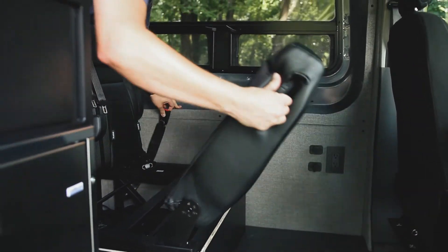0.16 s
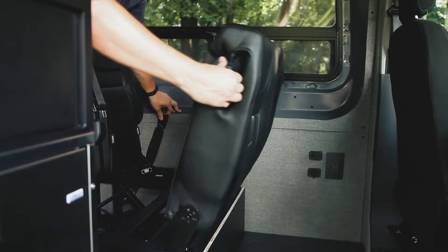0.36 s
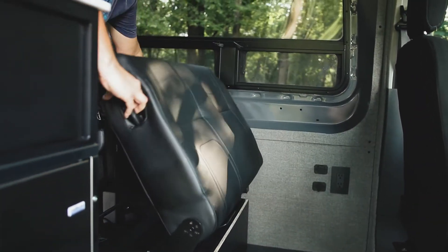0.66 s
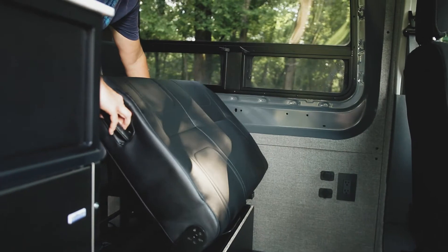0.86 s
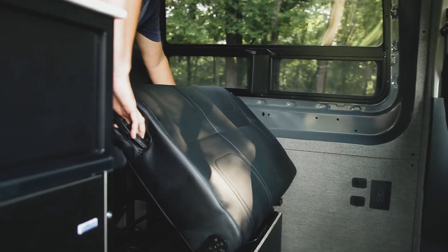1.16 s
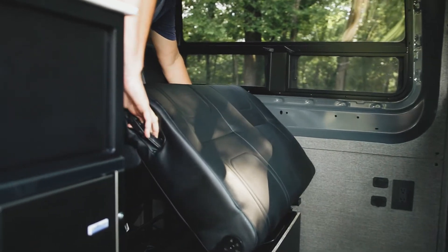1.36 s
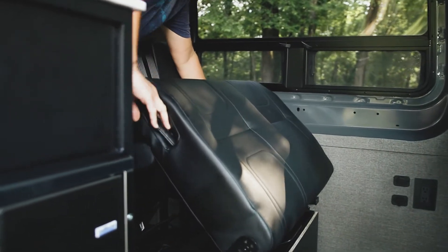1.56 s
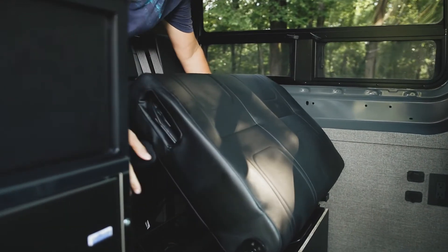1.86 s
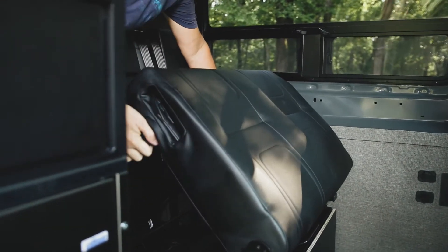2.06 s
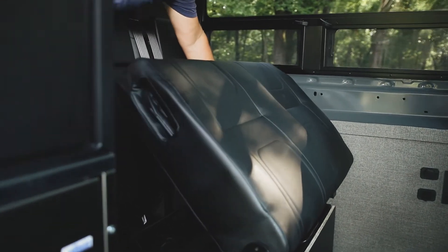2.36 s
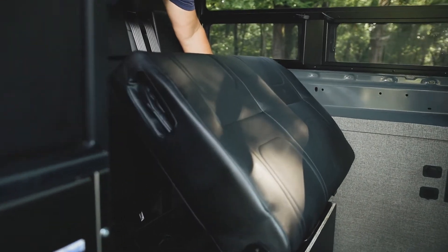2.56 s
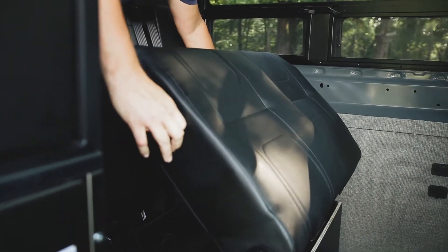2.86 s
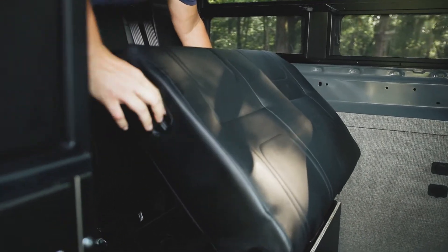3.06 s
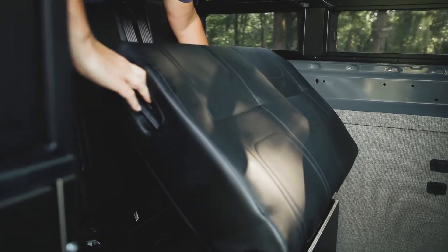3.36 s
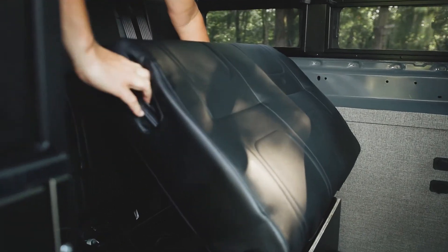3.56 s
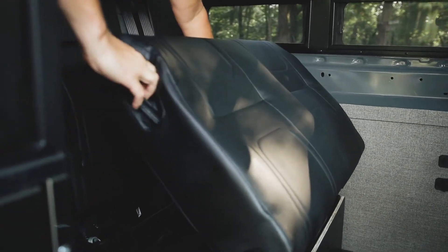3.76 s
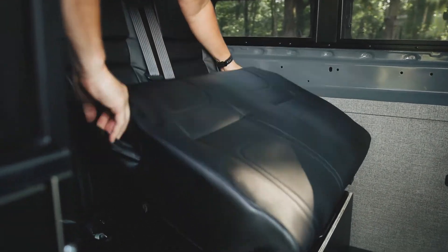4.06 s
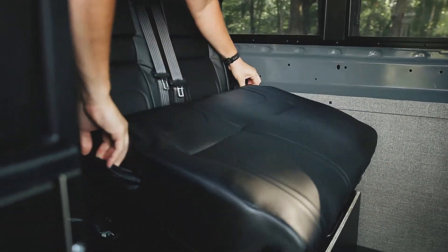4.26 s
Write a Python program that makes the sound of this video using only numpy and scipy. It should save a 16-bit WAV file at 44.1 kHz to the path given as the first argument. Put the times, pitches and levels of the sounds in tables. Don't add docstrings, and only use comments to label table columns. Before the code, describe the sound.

A padded bench seat is folded by hand: a brief rough hinge judder with bright vinyl friction, then light ticks and muffled cushion knocks. Midway comes a very sharp double latch click, by far the loudest event, with a short plate ring. Creasing and dull bumps lead to a low closing thud. Small dead interior, close miking, low rumbling sway and soft hiss.

```python
import sys
import numpy as np
from scipy import signal
from scipy.fft import rfft, irfft
from scipy.io import wavfile
from scipy.ndimage import uniform_filter1d

SR = 44100
rng = np.random.default_rng(int(sys.argv[2]) if len(sys.argv) > 2 else 0)


def generate_wav(sig):
    pcm = np.round(np.clip(np.atleast_2d(sig).T, -1, 1) * 32767).astype(np.int16)
    wavfile.write(sys.argv[1], SR, pcm)


def gain_from_db(level_db):
    decades = np.asarray(level_db, float) / 20
    return 10 ** decades


N = 194657


def evened(x):
    return x / np.sqrt(np.mean(x ** 2) + 1e-20)


def coloured(x, points):
    f, db = np.transpose(points)
    hz = np.fft.rfftfreq(len(x), 1 / SR)
    gain_db = np.interp(np.log(hz + 1), np.log(f + 1), db, -90, -90)
    return evened(irfft(rfft(x) * gain_from_db(gain_db), len(x)))


def band(x, lo_hz, hi_hz, order=2):
    sos = signal.butter(order, [lo_hz, min(hi_hz, 20000)], "bandpass", fs=SR, output="sos")
    return signal.sosfilt(sos, x)


def resonate(x, hz, width_hz):
    radius = np.exp(-np.pi * width_hz / SR)
    pole = radius * np.exp(2j * np.pi * hz / SR)
    return 2 * signal.lfilter([1 - radius], [1, -pole], x).real


def layers(x, edges_hz):
    hz = np.fft.rfftfreq(len(x), 1 / SR)
    octaves = np.log2((hz + 1) / np.reshape(edges_hz, (-1, 1)))
    above = .5 + .5 * np.tanh(5 * octaves)
    shares = -np.diff(above, axis=0)
    return (evened(irfft(rfft(x) * share, len(x))) for share in shares)


def columns(rows):
    s, *rest = np.transpose(rows)
    t = np.arange(s[0], s[-1], 1 / SR)
    return [np.interp(t, s, c) for c in rest]


def swells(s, db, rise_s, settle_s):
    s, db, rise_s, settle_s = (np.reshape(c, (-1, 1)) for c in (s, db, rise_s, settle_s))
    coarse = np.arange(0, N, 16)
    late = coarse / SR - s
    span = np.where(late < 0, -rise_s, settle_s)
    power = gain_from_db(db - 30 * abs(late / span)) ** 2
    return np.interp(np.arange(N), coarse, np.sqrt(power.sum(0)))


def crackle(count, per_s, spread_db):
    size = gain_from_db(spread_db * np.minimum(rng.exponential(1, count), 5))
    return evened(size * rng.standard_normal(count) * (rng.random(count) < per_s / SR))


def add(mix, s, sound):
    part = mix[round(s * SR):][:len(sound)]
    part += sound[:len(part)]


def play(mix, rows, sound):
    for s, *rest in rows:
        add(mix, s, sound(*rest))


# (frequency [Hz], density [dB per Hz])
CUSHION = [(35, -26), (60, -20), (87, 8), (157, 1.5), (295, 0.5), (389, -5.5), (459, -1.5), (981, -7),
           (1270, -1.5), (5000, -25.5), (6500, -18), (11000, -120)]
LAYERS_HZ = (85, 300, 1000, 3500)
# (time [s], level [dB], rise by 30 dB [s], settling by 30 dB [s])
RUBS = [(0.01, -54.5, 0.087, 1), (.21, -52, 0.29, 0.036), (.7, -53.5, 0.017, 1),
        (0.999, -49.5, 0.22, 0.065), (1.222, -54, 0.1, 0.021), (1.4, -55, 0.22, 0.055),
        (1.691, -53, 0.028, 0.35), (1.96, -49.5, 0.59, 0.27), (2.2, -62, 0.072, 0.39),
        (2.556, -55, 0.11, 0.066), (2.82, -62.5, 0.5, 0.026), (3.14, -59, 0.95, 0.35),
        (3.59, -53.5, 0.29, 0.081), (3.68, -59, .1, 0.11), (3.856, -54, 0.23, 0.037),
        (4.091, -54, 0.65, 0.075)]
# (time [s], level [dB], settling by 30 dB [s], foam weight [dB], skin rasp [dB])
GRIPS = [(.58, -43, .2, 4, -10), (.66, -58, .35, 10, -10), (1.228, -43.5, .14, -6, -16),
         (1.354, -53, .1, 1, -12), (1.414, -43, .11, -5, -12), (2.02, -26, .02, -5, 0),
         (2.033, -40, .14, 2, -2), (2.058, -43, .12, 2, 0), (2.076, -39, .07, 0, 0),
         (2.094, -18, .03, -14, -12), (2.11, -38, .09, 4, -5), (2.838, -49, .083, -6, -13),
         (3.274, -52, .05, -8, -10), (3.35, -49, .12, 0, -10), (3.616, -40, .12, -6, -14),
         (3.49, -54, .12, 2, -14), (3.865, -50, .12, 4, -20), (4.112, -41, .07, 3, -8),
         (4.15, -48, .3, -2, -3), (4.2, -47, .4, 2, -4), (4.28, -39, .1, 4, -9), (4.297, -41, .12, 7, -9),
         (4.326, -41, .075, 5, -10)]


def rub():
    clumps = gain_from_db(1.06 * evened(band(rng.standard_normal(N), 23.2, 47)))
    grains = rng.standard_normal(N) + 0.23 * crackle(N, 400, 4.0)
    foam, cover, rasp = layers(coloured(clumps * grains, CUSHION), LAYERS_HZ)
    s, db, settle_s, foam_db, rasp_db = np.transpose(GRIPS)
    rise_s = 0.014
    grips = swells(s, db, rise_s, settle_s)
    rubs = swells(*np.transpose(RUBS))
    weight = swells(s, db + foam_db, rise_s, 1.1 * settle_s) + gain_from_db(-2) * rubs
    skin = swells(s, db + rasp_db, rise_s, settle_s) + gain_from_db(-6) * rubs
    return gain_from_db(-5.0) * ((grips + rubs) * cover + skin * rasp + weight * foam)


# (time [s], level [dB], settling by 30 dB [s], its sign is of no effect)
JOLTS = [(.13, -47, 2.5), (.22, -46, 2.5), (.47, -47, -0.8), (.8, -68, -1.5), (1.26, -47.5, 0.8),
         (1.47, -57, 6), (1.73, -58, 1), (2.1, -32.5, 0.32), (2.299, -50.5, 0.9), (2.5, -55, 1),
         (2.84, -53.5, 0.5), (3.13, -60, -5), (3.45, -53.5, 4), (3.63, -43, 0), (3.87, -45, 0.7),
         (4.2, -44.5, -8), (4.29, -38, -7), (4.39, -45, -2)]


def sway():
    s, db, settle_s = np.transpose(JOLTS)
    wobble = evened(band(rng.standard_normal(N), 18.3, 80.6, order=3))
    wobble /= np.sqrt(uniform_filter1d(wobble ** 2, 5000))
    drift = evened(band(rng.standard_normal(N), 3.1, 16.8))
    return swells(s, db - 6.0, 0.14, settle_s) * wobble + gain_from_db(-56.5) * drift


# (frequency [Hz], level [dB])
FRAME = [(110, 23), (215, 13), (300, 0.5), (380, 5), (480, -13), (600, -0.5), (790, -26), (1000, -68),
         (1300, 3), (1600, 9), (2250, -43)]


def knock(db, hz, t60, edge_db, contact_ms):
    t = np.arange(round(.2 * SR)) / SR - .0035
    chance = rng.standard_normal((3, len(t)))
    fall = gain_from_db(-60 * t / t60) * (t > 0)
    bounces = chance[0] * (abs(chance[1]) > 2.6) * fall
    blow = 1.16 * np.exp(-(t * SR) ** 2) + bounces + 0.13 * chance[1] * fall
    modes = np.zeros(len(t))
    for f, mode_db in FRAME:
        near = gain_from_db(mode_db - 16.0 * abs(np.log2(f / hz)))
        modes += near * resonate(blow, f, 0.9 / t60 + 0.14 * f) / np.sqrt(f)
    modes += gain_from_db(-20.0) * resonate(blow, hz, 5.4 / t60 + 0.0079 * hz) * np.sqrt(300 / hz)
    modes = band(modes, 0.35 * hz, 1000 / contact_ms, order=4)
    edge = band(chance[2] * fall, 1900, 6500)
    return gain_from_db(db) * (modes / abs(modes).max() + gain_from_db(edge_db) * edge / abs(edge).max())


# (time [s], peak level [dB], pitch of struck part [Hz], T60 [s])
HARD = [(0.134, -41.5, 173, 0.058), (0.599, -35, 253, 0.095), (0.978, -62, 447, 0.083),
        (1.229, -41, 435, 0.12), (1.329, -41.5, 270, 0.22), (1.413, -36.5, 476, 0.12),
        (2.105, -29, 715, 0.054), (2.23, -51, 172, 0.058), (2.538, -49, 370, 0.045),
        (3.215, -51, 245, 0.15), (3.614, -35.5, 345, 0.1), (4.105, -31.5, 277, 0.046),
        (4.119, -29, 344, 0.076)]
# (time [s], peak level [dB], pitch of struck part [Hz], T60 [s])
SOFT = [(0.213, -35, 222, 0.72), (3.345, -41, 298, 0.18), (3.66, -49, 295, 0.19), (1.178, -48, 307, 0.12),
        (1.249, -39, 160, 0.16), (1.698, -40.5, 830, 0.058), (2.829, -44, 380, 0.1),
        (3.268, -43.5, 298, 0.18), (3.629, -40, 294, 0.29), (3.795, -46, 174, 0.077),
        (3.862, -42, 284, 0.065), (3.884, -43, 248, 0.13), (3.918, -43, 174, 0.045),
        (4.128, -36, 171, 0.024), (4.271, -37, 181, 0.073), (4.28, -39, 234, 0.13), (4.323, -29, 302, 0.06)]


def hand_knocks(hits):
    play(hits, HARD, lambda *blow: knock(*blow, edge_db=-14.5, contact_ms=0.43))
    play(hits, SOFT, lambda *blow: knock(*blow, edge_db=-22, contact_ms=1.5))


# (time [s], effort level [dB], slip rate [Hz])
SWING = [(0.17, -65, 67.9), (0.22, -42.5, 71.13), (0.266, -33.5, 74.8), (0.34, -31, 85.4),
         (0.418, -26, 73.72), (0.464, -31, 65.76), (0.5, -31, 58.7), (0.542, -34.5, 58.7),
         (0.66, -65, 66.7)]
# (frequency [Hz], bandwidth [Hz], level [dB])
SEAT = [(240, 19, -6), (380, 16, 3.5), (600, 126, -7), (787, 29.4, -1.5), (950, 310, -14), (1444, 23, -2),
        (1640, 320, -12.5), (2470, 340, -8.5), (3110, 640, -13.5)]
# (time [s], level [dB], rise by 30 dB [s], settling by 30 dB [s])
PUMP = [
    (.22, -40.5, 0.044, 0.22),
    (.32, -49, .3, 0.25),
    (0.489, -29.5, 0.13, 0.23),
]


def hinge():
    effort_db, slip_hz = columns(SWING)
    count, start = len(slip_hz), round(SWING[0][0] * SR)
    turns = np.cumsum(slip_hz * (1 + 0.27 * uniform_filter1d(rng.standard_normal(count), 300))) / SR
    phase = 2 * np.pi * turns

    k = np.arange(1, 40)[:, None]
    spread = rng.standard_normal((39, 1))
    slips = evened((np.cos(k * phase + 1.62 * spread) * gain_from_db(-.3 * k)).sum(0))
    gate = 0.89 + np.exp(-(turns % 1) / .5)
    scrape = evened(gate * rng.standard_normal(count))
    rough = 0.31
    drive = (1 - rough) * slips + rough * 5.55 * scrape

    bite_db = -7.5 + 10.5 * np.arange(count) / SR
    body = np.zeros(count)
    for i, (hz, width_hz, db) in enumerate(SEAT):
        body += (-1) ** i * gain_from_db(db + bite_db * (hz > 1200)) * resonate(drive, hz, width_hz)

    gap_hz = 562 * (slip_hz / 86.7) ** 1.95
    gap_db = -1 + 12 * np.minimum(effort_db + 33.5, 0)
    carrier = np.exp(2j * np.pi * np.cumsum(gap_hz) / SR)
    lowpass = signal.butter(2, 110, fs=SR, output="sos")
    gap = (carrier * signal.sosfilt(lowpass, (drive + 0.22 * slips) / carrier)).real
    body = evened(band(body, 330, 3800)) + gain_from_db(gap_db) * evened(gap)

    puffs = -evened(np.cos(phase) * 0.47 + np.cos(2 * phase) + 0.36 * np.cos(3 * phase))
    pump = swells(*np.transpose(PUMP))[start:][:count] / gain_from_db(effort_db)
    hum = swells(s=0.23, db=-33.5, rise_s=.5, settle_s=.2)[start:][:count] / gain_from_db(effort_db)
    unsteady_db = 0.95 * evened(band(rng.standard_normal(count), 15.6, 28))
    judder = evened(body) + pump * puffs + hum * np.cos(3 * phase)
    judder = gain_from_db(effort_db + unsteady_db) * judder * signal.windows.tukey(count, .1)
    return judder, gate / gate.mean(), effort_db


# (frequency [Hz], density [dB per Hz])
VINYL = [(1470, 35), (2500, 1.5), (2700, -14), (3270, -14.5), (4180, -14), (4440, -11.5), (5380, -10.5),
         (6460, -13), (7650, -11.5), (9410, -11), (10400, -10), (13800, -20.5), (15600, -19)]
# (frequency [Hz], bandwidth [Hz], level [dB])
RIDGES = [(6430, 630, -12), (8940, 500, -6.5), (14000, 550, -12)]
SPLITS_HZ = (2800, 7500, 11500, 16500)


def slide(level_db, dull_db, fine_db):
    count = len(level_db)
    fizz = coloured(rng.standard_normal(count) + 0.4 * crackle(count, 1500, 4.1), VINYL)
    fizz = fizz + sum(gain_from_db(db) * resonate(fizz, hz, width_hz) for hz, width_hz, db in RIDGES)
    dull, mid, fine = layers(fizz, SPLITS_HZ)
    flutter_db = 0.33 * evened(band(rng.standard_normal(count), 25, 83))
    return gain_from_db(level_db + flutter_db) * (mid + gain_from_db(dull_db) * dull + gain_from_db(fine_db) * fine)


def stroke(length_s, db, dull_db, fine_db):
    t = np.arange(round(.35 * SR)) / SR - .25
    touch_db = 20 * np.log10(np.clip((t + length_s) / (0.39 * length_s), 1e-4, 1))
    swell_db = np.where(t < 0, 8 * t / length_s, -791 * t)
    return slide(db + touch_db + swell_db, dull_db, fine_db)


# (time of stop [s], length [s], level [dB], dull part [dB], finest fizz [dB])
STROKES = [(0.204, .012, -65, -1, -8), (0.271, 0.03, -43.5, -23, -24), (.31, 0.047, -52.5, -10, -6),
           (0.379, 0.093, -50.5, 6.5, 1), (0.451, 0.11, -52, -1, -11), (0.53, 0.037, -58, -2, -6),
           (0.561, 0.014, -55.5, -2, -10), (2.011, 0.19, -66.5, 5.5, -1), (2.027, 0.014, -65, -10, -12),
           (2.044, 0.076, -57.5, 4.5, 3), (2.088, 0.037, -46, -4.5, -2), (2.129, 0.036, -61.5, -3, -3),
           (4.211, 0.1, -59, 0.5, 10), (4.28, 0.078, -54.5, -3.5, 9), (4.339, 0.086, -62, 3, -1)]


def vinyl_swish(effort_db):
    swish = np.zeros(N + SR)
    level_db = -56 + 1.17 * (effort_db + 30.0)
    add(swish, 1 + SWING[0][0], slide(level_db, dull_db=5, fine_db=-1.5))
    for stop_s, *rest in STROKES:
        add(swish, 1 + stop_s - .25, stroke(*rest))
    return swish


def ring(db, hz, t60):
    t = np.arange(round(.3 * SR)) / SR
    return gain_from_db(db - 60 * t / t60) * np.sin(2 * np.pi * hz * t) * (1 - np.exp(-t * hz * 3))


# (time [s], peak level [dB], frequency [Hz], T60 [s])
RINGS = [(1.663, -49, 87.5, 0.41), (1.696, -52, 457, 0.051), (1.699, -50, 1190, 0.044),
         (1.785, -47, 488, 0.054), (1.918, -49, 735, 0.051), (2.832, -45, 480, 0.048),
         (3.2705, -38, 510, 0.019), (3.2705, -49, 1240, 0.016), (3.3445, -37, 600, 0.02),
         (3.346, -42.5, 330, 0.1), (3.104, -50.5, 1300, 0.067), (3.104, -53, 700, 0.036),
         (2.0192, -27, 940, 0.011), (2.019, -29, 2200, 0.013), (2.094, -22, 200, 0.071),
         (4.145, -54, 1250, 0.031), (4.181, -45, 1910, .03), (4.183, -46, 1370, .03),
         (4.122, -39, 377, 0.019), (4.129, -29, 226, 0.019), (.669, -49, 1020, .05), (.725, -45, 983, .04),
         (.753, -41.5, 970, 0.023), (.81, -46.5, 456, 0.087), (1.003, -45, 476, 0.076),
         (1.245, -49.5, 1786, 0.096), (3.489, -49.5, 292, 0.18), (3.5, -48, 556, 0.088),
         (3.557, -36.5, 140, 0.052), (3.553, -51.5, 690, 0.11), (3.607, -32, 95, 0.13),
         (3.632, -39.5, 300, 0.34), (3.665, -33, 134, 0.059), (3.861, -38, 101.5, 0.32),
         (3.862, -43, 443, 0.13), (3.864, -44, 211, .15), (3.882, -35, 140, 0.088),
         (3.915, -36, 153, 0.087), (4.1085, -30, 1273, 0.018), (4.1085, -24, 325, 0.038),
         (4.2751, -20.5, 202, 0.057), (4.275, -29, 600, 0.055), (4.289, -31.5, 102, 0.26),
         (4.305, -34, 338, 0.15), (4.345, -38.5, 106, 0.52), (.212, -40, 740, 0.037),
         (.603, -42, 802, 0.13), (.699, -44, 944, 0.041), (2.0232, -19, 1047, 0.022)]


def frame_rings(hits):
    play(hits, RINGS, ring)


# (time [s], level [dB], frequency [Hz], rise by 30 dB [s], settling by 30 dB [s])
SINGS = [(.265, -52, 9500, 0.04, 0.11), (.29, -57, 6650, .15, .1), (.33, -52, 13700, .08, .3),
         (.345, -52, 6270, 0.22, .15), (.4, -45, 6520, .2, 0.22), (.38, -48, 9600, 0.24, 0.13),
         (.39, -57, 11500, .15, .15), (.445, -48, 9200, .15, .05), (.45, -52, 5180, 0.13, 0.17),
         (.5, -64, 13500, .1, .15), (.515, -55, 5450, .08, 0.074), (.535, -64, 11300, .05, 0.045),
         (.56, -57, 11200, .04, .04)]


def seam_sing():
    fizz = rng.standard_normal(SR) + .4 * crackle(SR, 1200, 3.2)
    song = np.zeros(SR)
    for s, db, hz, rise_s, settle_s in SINGS:
        note = resonate(resonate(fizz, hz, 460), hz, 460)
        song += swells(s, db, rise_s, settle_s)[:SR] * evened(note)
    return song


def tick(db, hz, t60):
    t = np.arange(round(.1 * SR)) / SR
    burst = rng.standard_normal(len(t)) * gain_from_db(-60 * t / t60) * (1 - np.exp(-t / 0.000092))
    mode = band(burst, 0.76 * hz, 1.134 * hz)
    return gain_from_db(db) * mode / abs(mode).max()


# (time [s], peak level [dB], frequency [Hz], T60 [s])
TICKS = [(.605, -45, 2350, 0.025), (.668, -52, 915, 0.026), (.678, -42.5, 3323, 0.051),
         (.699, -47, 880, 0.028), (.725, -49, 870, 0.021), (.727, -49.5, 3330, 0.027),
         (.753, -48, 814, 0.024), (.755, -48, 2750, .03), (.795, -52, 2200, .02), (.834, -56, 2320, 0.023),
         (1.246, -49, 6550, .06), (1.247, -45.5, 1760, 0.044), (1.415, -42.5, 2250, 0.038),
         (1.415, -47.5, 4620, .05), (1.418, -50.5, 6150, 0.055), (4.109, -42, 1270, 0.013),
         (4.147, -51, 1300, 0.034), (4.18, -47, 1950, 0.034), (4.11, -41, 2380, 0.035),
         (2.019, -24.5, 1900, 0.024), (2.018, -25, 2300, .022), (3.271, -49, 1090, 0.026),
         (3.624, -43, 1500, 0.057), (2.833, -47, 700, .04), (3.1, -47, 1450, .04), (3.345, -44, 780, .04),
         (4.276, -38, 643, 0.029), (4.275, -44, 197, 0.046), (2.094, -30, 150, 0.091),
         (4.324, -44, 1160, 0.036)]


def metal_ticks(hits):
    play(hits, TICKS, tick)


def thump(db, hz, t60):
    t = np.arange(round(.6 * SR)) / SR
    return gain_from_db(db - 60 * t / t60) * np.sin(2 * np.pi * hz * t) * (1 - np.exp(-t / .003))


# (time [s], peak level [dB], frequency [Hz], T60 [s])
THUMPS = [
    (1.298, -45, 20, .4),
    (1.743, -39, 19.5, .7),
    (2.1, -33, 22, .5),
    (3.6, -40, 30, .4),
    (4.289, -18.5, 17.5, .5),
]


def floor_thumps(seat):
    play(seat, THUMPS, thump)


def snap(db, blow_ms, edge_db, recoil):
    t = np.arange(round(.06 * SR)) / SR - .002
    u = t / (blow_ms * 0.00081)
    push = ((1 - recoil) * (1 - .5 * u ** 2) - recoil * 1.56 * u) * np.exp(-u ** 2 / 2)
    chatter = 0.13 * rng.standard_normal(len(t)) * (t > 0) * gain_from_db(-60 * t / 0.034)
    hit = np.exp(-(t / 6e-5) ** 2) + chatter
    edge = band(hit, 4020, 5860) + 0.57 * band(hit, 8500, 13400)
    return gain_from_db(db) * (push + gain_from_db(edge_db) * edge / abs(edge).max())


# (time [s], peak level [dB], pitch of struck part [Hz], T60 [s])
RATTLE = [(2.012, -26.5, 450, 0.039), (2.0157, -22.5, 240, 0.061), (2.0188, -32, 1020, 0.022),
          (2.033, -52, 920, .05), (2.0417, -21.5, 317, 0.025), (2.057, -26, 600, 0.024),
          (2.075, -27, 400, 0.029), (2.0903, -27, 228, 0.091), (2.095, -21.5, 914, 0.068),
          (2.12, -43, 200, .12)]
# (time [s], peak level [dB], frequency [Hz], T60 [s])
PLATE = [(2.0153, -14, 327, 0.026), (2.0201, -21.5, 229, 0.066), (2.098, -27.5, 1500, 0.036),
         (2.107, -27, 1100, 0.031), (2.06, -34, 1510, .04), (2.073, -35.5, 1290, .05),
         (4.324, -38, 1160, 0.034), (4.324, -37, 860, 0.037)]
# (time [s], peak level [dB], blow length [ms], edge relative to push [dB], recoil share [0-1])
SNAPS = [
    (2.0186, -5, 0.25, -10, 0.0),
    (2.092, -12, 0.38, -30, 0.9),
]


def latch(hits):
    play(hits, RATTLE, lambda *blow: knock(*blow, edge_db=-26, contact_ms=0.67))
    play(hits, PLATE, ring)
    for s, *rest in SNAPS:
        add(hits, s - .002, snap(*rest))


def cabin(x):
    t = np.arange(round(.2 * SR)) / SR
    tail = band(rng.standard_normal(len(t)) * gain_from_db(-60 * t / 0.21) * (t > .003), 240, 8500)
    return signal.fftconvolve(x, tail / np.linalg.norm(tail))[:N]


def scene():
    seat = rub() + sway()
    hits = np.zeros(N + SR)
    hand_knocks(hits)
    judder, gate, effort_db = hinge()
    add(seat, SWING[0][0], judder)
    swish = vinyl_swish(effort_db)
    throb = np.ones(N)
    add(throb, SWING[0][0], .5 * (gate - 1))
    frame_rings(hits)
    add(swish, 1, seam_sing())
    metal_ticks(hits)
    floor_thumps(seat)
    latch(hits)
    mix = seat + swish[SR:] * throb + hits[:N] + gain_from_db(-18.5) * cabin(hits)
    return np.array([mix, mix])


# (frequency [Hz], density [dB per Hz])
HISS = [(35, -21), (60, -3), (243, -7), (280, -5), (329, -10.5), (856, -10.5), (940, -11), (1080, -12),
        (1240, -15), (10900, -19), (15800, -18.5)]
# (frequency [Hz], density [dB per Hz])
APART = [(35, -56), (60, 5), (149, 4.5), (436, 5.5), (817, 5), (962, 4.5), (1160, 5), (8220, 5), (15800, 4)]


def microphone_hiss():
    mid = gain_from_db(-60) * coloured(rng.standard_normal(N), HISS)
    side = gain_from_db(-63) * coloured(rng.standard_normal(N), APART)
    return np.array([mid + side, mid - side])


def band_limit(x):
    return signal.sosfilt(signal.butter(12, 16550, fs=SR, output="sos"), x)


def record(dry):
    mix = dry + microphone_hiss() + .0026
    return band_limit(mix)


dry = scene()
out = record(dry)
generate_wav(out)
```